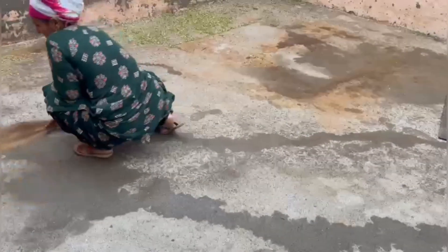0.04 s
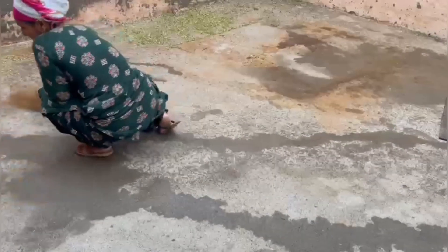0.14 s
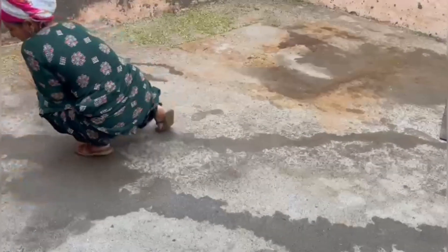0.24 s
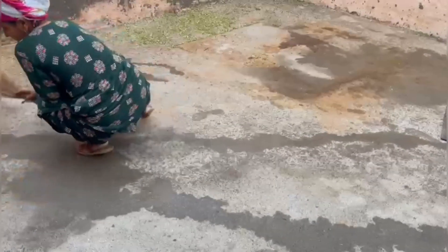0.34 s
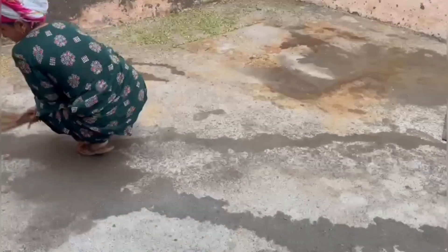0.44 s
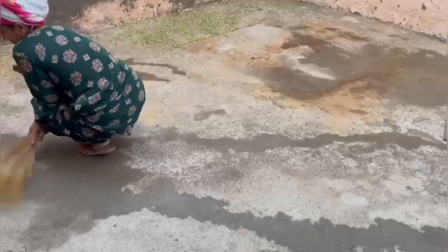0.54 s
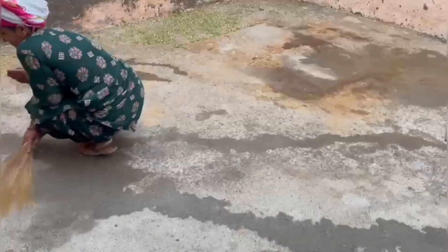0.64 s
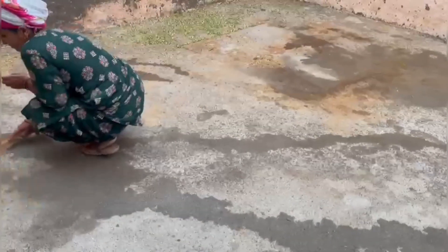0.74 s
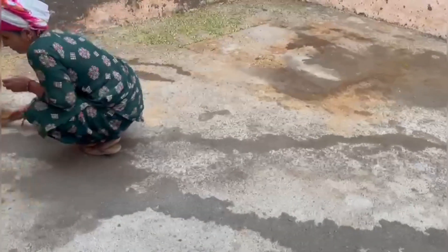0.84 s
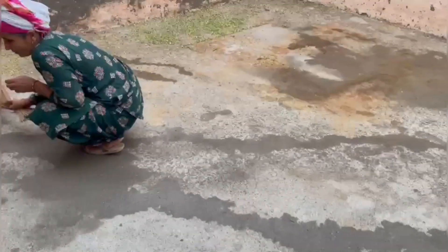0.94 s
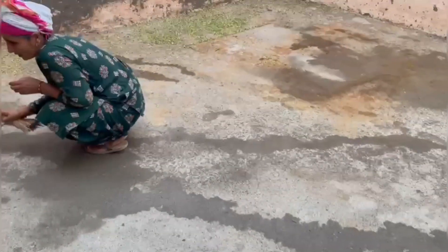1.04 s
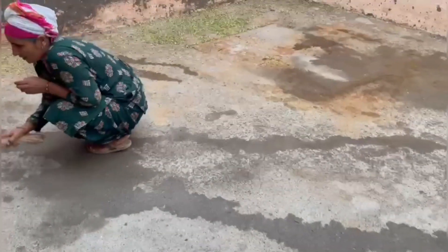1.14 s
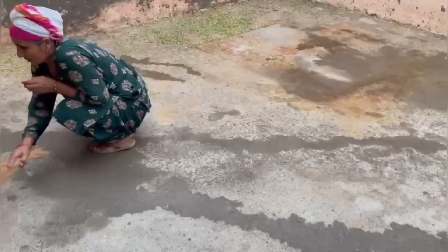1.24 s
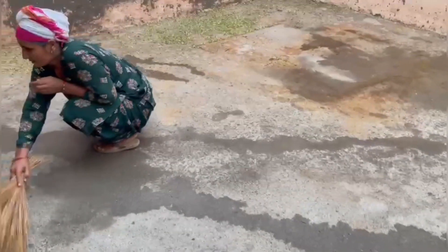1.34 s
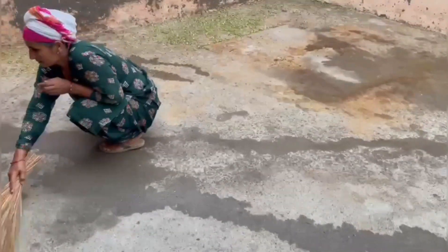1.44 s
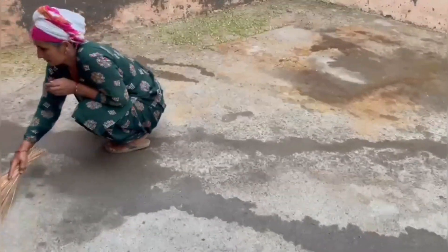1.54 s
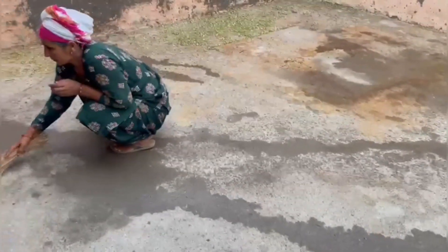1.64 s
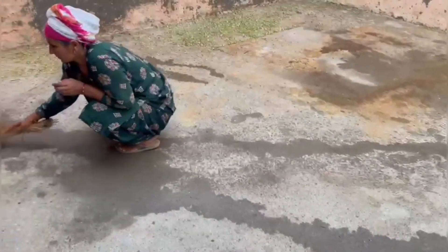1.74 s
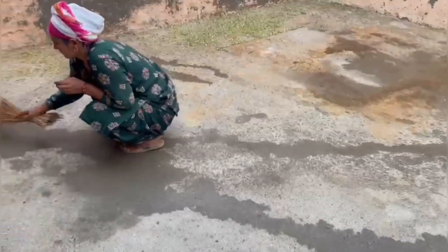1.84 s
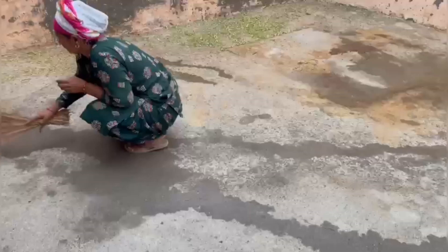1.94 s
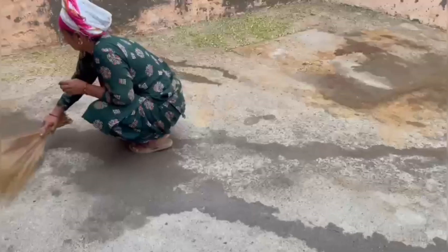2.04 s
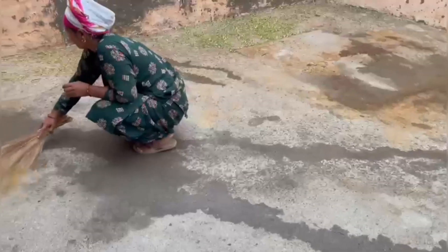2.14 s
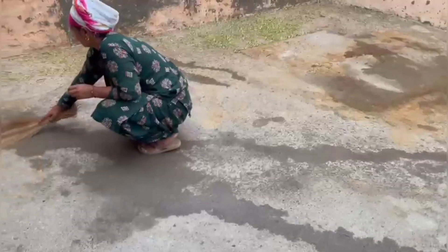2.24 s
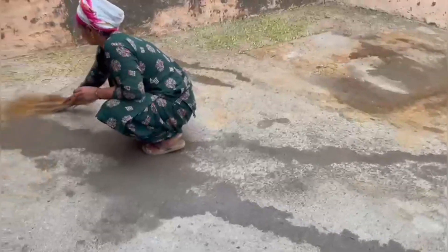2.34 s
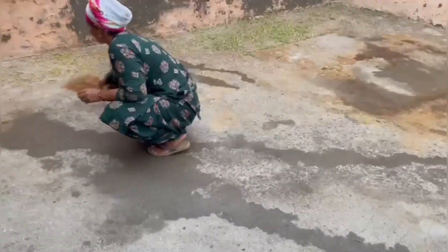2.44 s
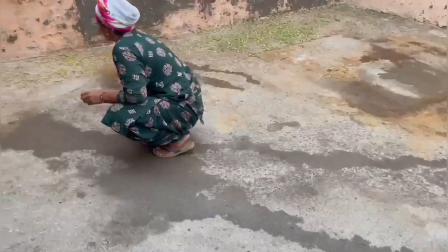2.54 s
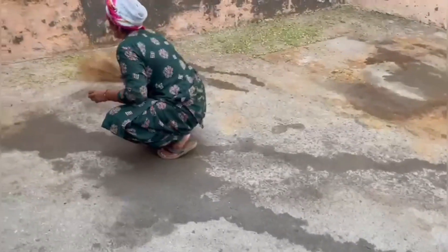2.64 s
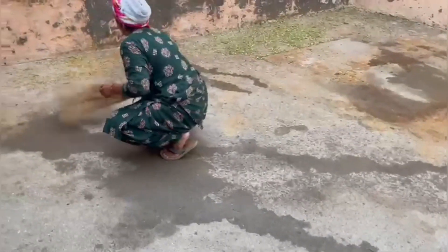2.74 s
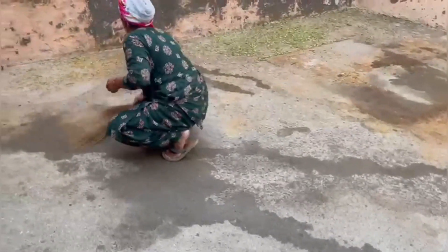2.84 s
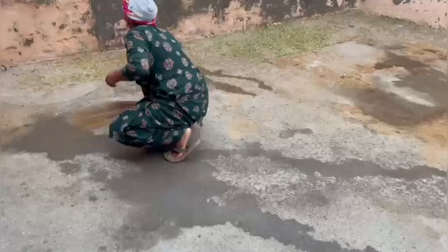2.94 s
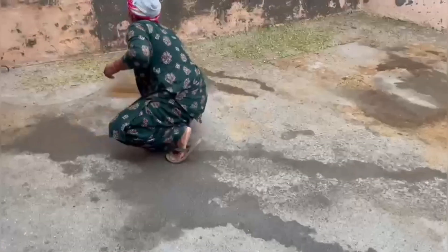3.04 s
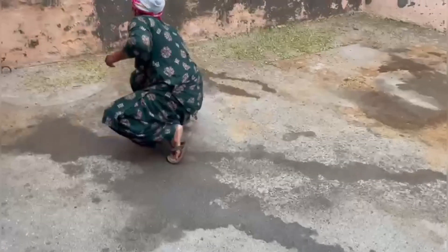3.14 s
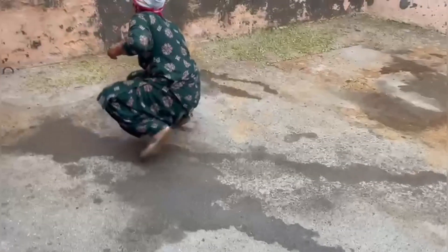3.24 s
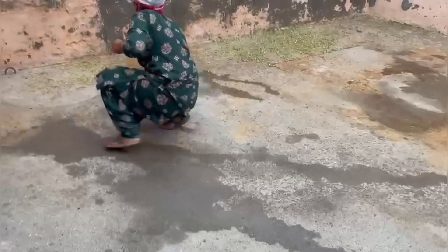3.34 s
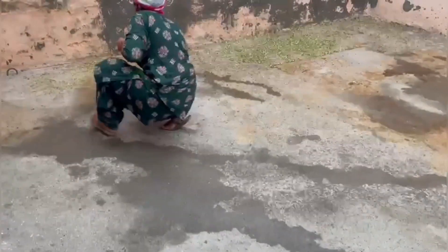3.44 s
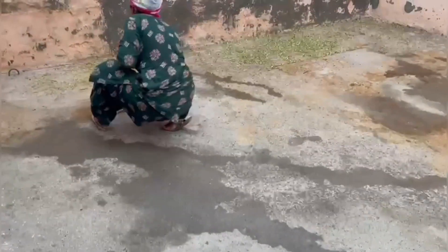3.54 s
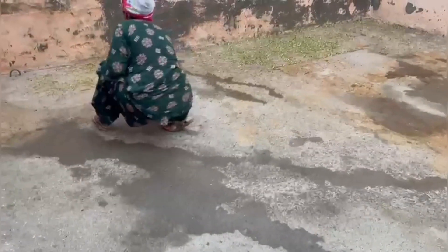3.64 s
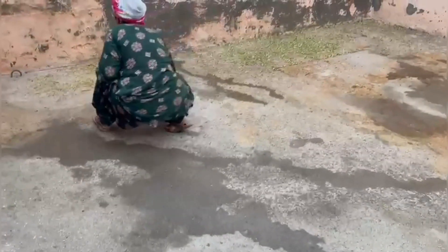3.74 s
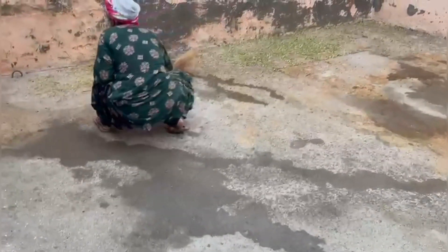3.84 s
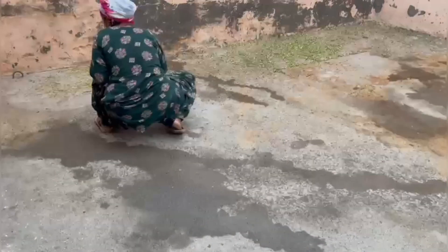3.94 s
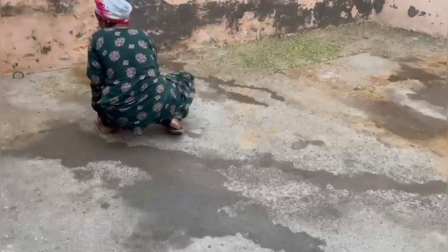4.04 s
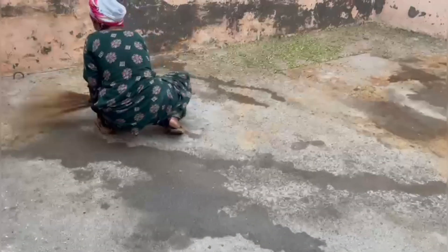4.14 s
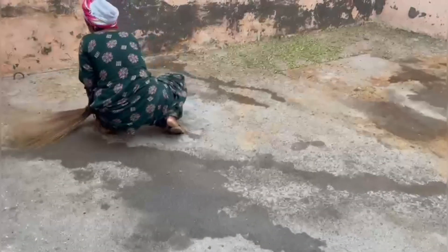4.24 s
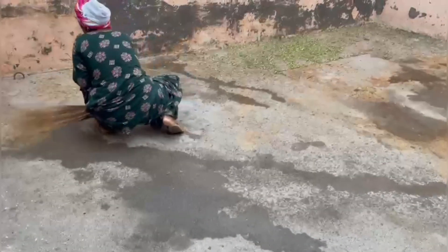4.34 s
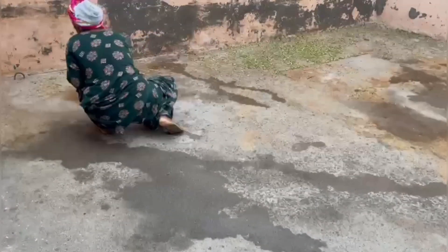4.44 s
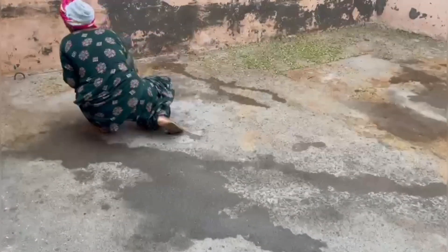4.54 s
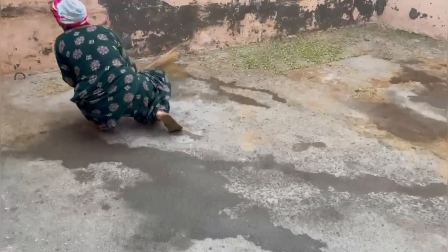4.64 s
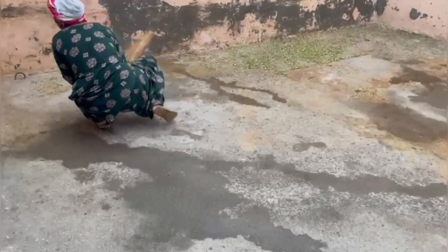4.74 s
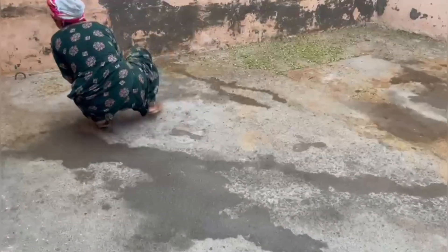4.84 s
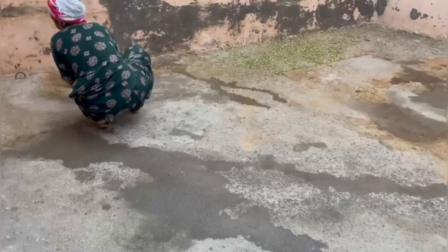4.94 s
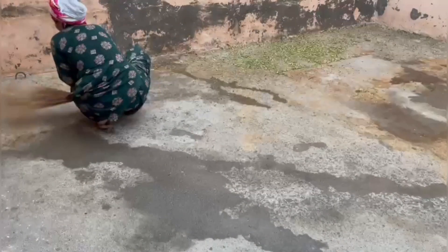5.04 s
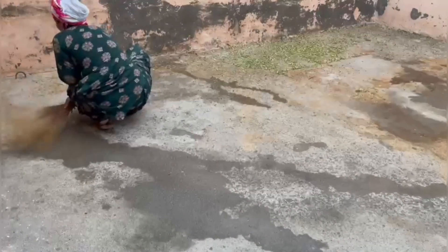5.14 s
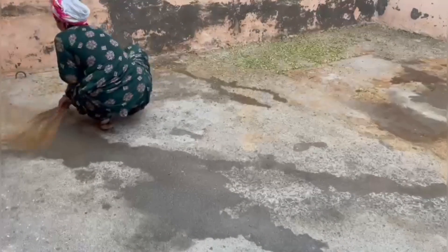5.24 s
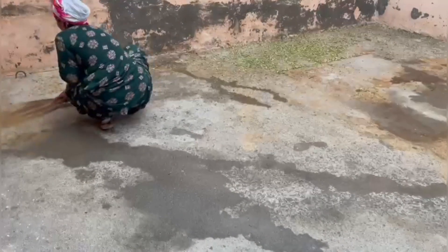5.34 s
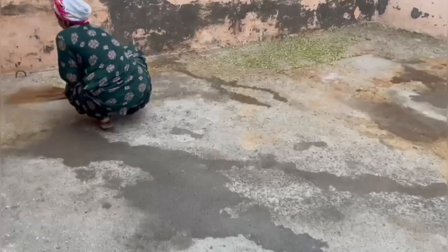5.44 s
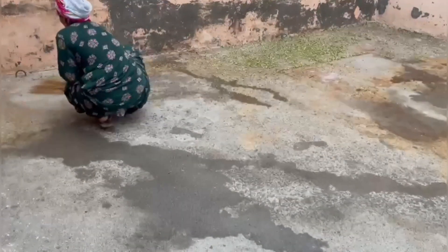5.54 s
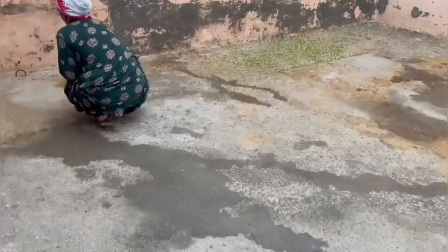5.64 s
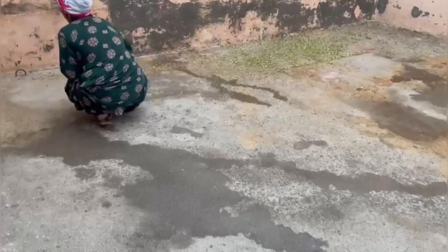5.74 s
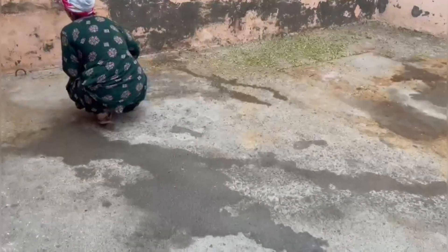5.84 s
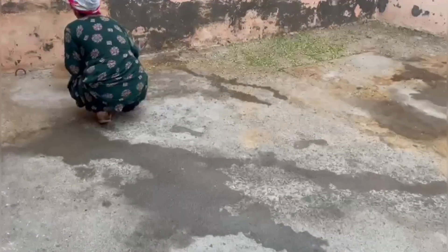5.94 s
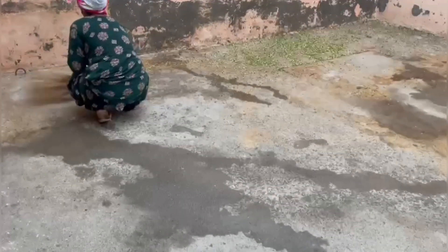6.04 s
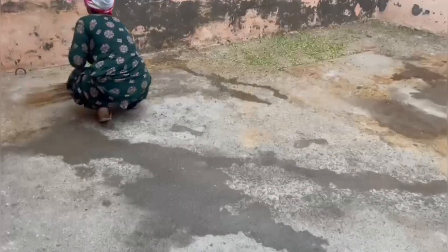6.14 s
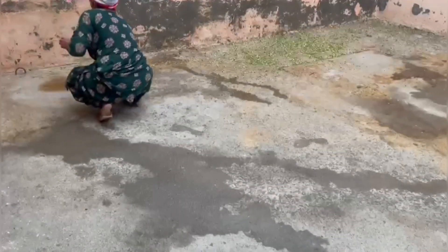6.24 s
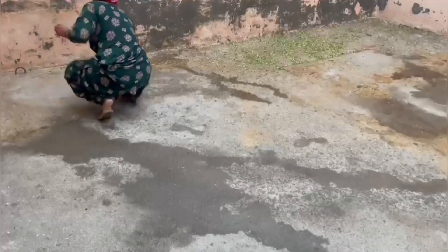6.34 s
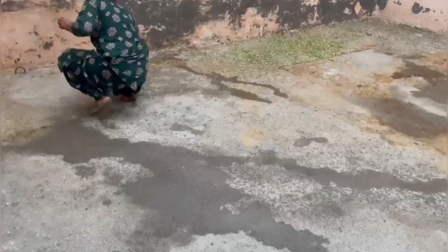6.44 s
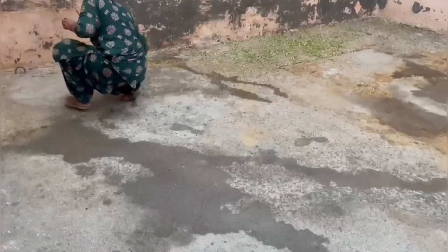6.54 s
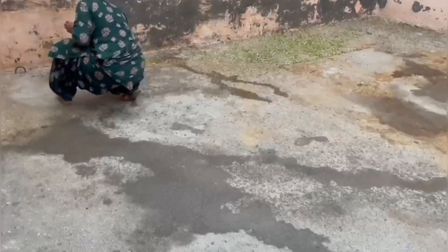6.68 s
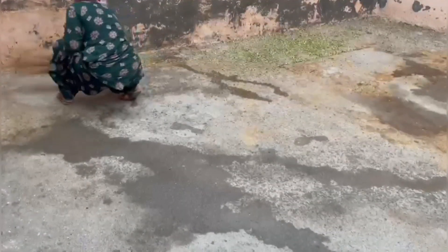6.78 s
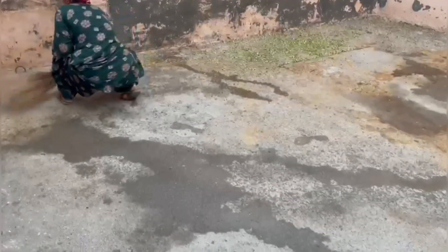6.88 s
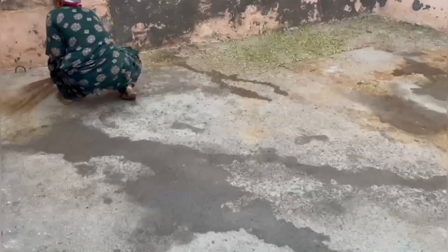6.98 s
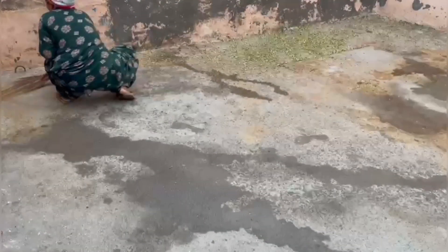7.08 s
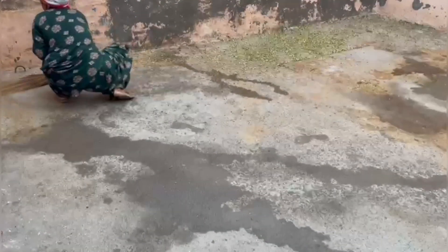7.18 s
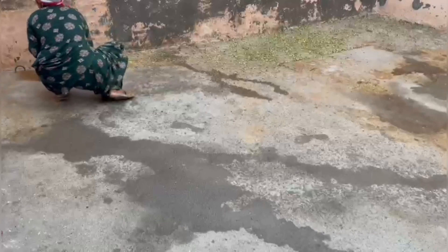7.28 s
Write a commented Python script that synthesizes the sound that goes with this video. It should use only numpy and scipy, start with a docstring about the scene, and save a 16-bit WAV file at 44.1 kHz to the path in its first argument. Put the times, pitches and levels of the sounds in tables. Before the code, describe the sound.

A short straw broom swishes over wet courtyard concrete in repeated strokes, with a few sandal slaps and faint distant traffic.

```python
"""A short straw broom sweeps wet concrete in a walled courtyard, a few metres away.
Thousands of straw tips slip over the grit as tiny clicks that merge into a hiss; the pressed bundle
scrapes lower. Straws snap, sandals slap, a bird trills once, distant traffic rumbles and hums.
A phone's two microphone ports colour the treble and turn its phase against each other."""
import sys
import numpy as np
from scipy import signal
from scipy.fft import rfft, irfft, next_fast_len
from scipy.io import wavfile
from scipy.ndimage import uniform_filter1d, map_coordinates

SR = 44100
rng = np.random.default_rng(int(sys.argv[2]) if len(sys.argv) > 2 else 0)


def generate_wav(sig):
    """Save sig (samples, or channels by samples) to the path in sys.argv[1] as 16-bit PCM at SR."""
    pcm = np.round(np.clip(np.atleast_2d(sig).T, -1, 1) * 32767).astype(np.int16)
    wavfile.write(sys.argv[1], SR, pcm)


N = 322371


def undb(db):
    return 10 ** (np.asarray(db) / 20)


def unit_rms(x):
    return x / np.sqrt(np.mean(x ** 2))


def over_time(table):
    """Rows of (t/s, ...) as automation curves, one value a sample."""
    times, *columns = np.transpose(table)
    return [np.interp(np.arange(N) / SR, times, c) for c in columns]


def over_hz(table):
    """Rows of (f/Hz, ...) as curves over log frequency, one value a bin."""
    hz, *columns = np.transpose(table)
    bins = np.fft.rfftfreq(next_fast_len(N), 1 / SR)
    return [np.interp(np.log(bins + 1), np.log(hz), c) for c in columns]


def equalise(x, gain):
    return irfft(rfft(x, next_fast_len(N)) * gain, next_fast_len(N))[..., :N]


def colour(x, eq):
    """Apply an EQ of (f/Hz, gain/dB) rows and bring the result to unit RMS."""
    return unit_rms(equalise(x, undb(over_hz(eq)[0])))


def click(pulses, eq):
    """Unit pulses become short clicks of peak 1, coloured by the EQ."""
    gain = undb(over_hz(eq)[0])
    return equalise(pulses, gain / gain.mean())


def wobble(rate):
    """Random modulator: values held 1 / rate s and smoothed twice; spread near 1."""
    hold = int(SR / rate)
    steps = np.repeat(rng.standard_normal(N // hold + 1), hold)
    return 1.01 * uniform_filter1d(uniform_filter1d(steps, hold), hold)[:N]


def wander(x, per_octave, depth_db, rate):
    """Resonances and hollows come and go: a smooth random gain over pitch and time."""
    hz, t, frames = signal.stft(x, SR, nperseg=512)
    grid = np.meshgrid(per_octave * np.log2(1 + hz / 300), rate * t, indexing="ij")
    ripple = map_coordinates(rng.standard_normal((100, 400)), grid, mode="mirror")
    return signal.istft(frames * undb(depth_db * ripple), SR, nperseg=512)[1][:, :N]


def add(out, start, x):
    i = int(start * SR)
    out[i:i + len(x)] += x[:N - i]


def decay(t60):
    """A quarter-second envelope that falls 60 dB in t60 seconds."""
    return np.exp(-np.log(1000) * np.arange(SR // 4) / SR / t60)


# EQ of the traffic bed: f/Hz, gain/dB
TRAFFIC_EQ = [(25, -23), (36, -14), (48, 8.5), (65, 4), (100, -5.5), (200, -15), (300, -19), (800, -24.5),
              (2000, -30), (4000, -39), (7000, -37.5), (8500, -33.5), (10500, -35), (11000, -44),
              (11500, -94)]
# swells of the rumble: t/s, deep level/dB, low level/dB
RUMBLE_SWELLS = [(0.0, -48, -49), (0.98, -48, -46.5), (1.2, -51, -51), (1.73, -46.5, -45.5),
                 (2.04, -54, -43.5), (2.38, -46.5, -44), (2.52, -48, -45.5), (3.18, -49, -45),
                 (3.38, -43, -44.5), (3.79, -50, -45.5), (4.34, -46, -47), (4.74, -47, -43.5),
                 (4.87, -46, -46), (5.15, -40.5, -48), (6.03, -43, -47), (6.6, -41, -46.5),
                 (6.98, -42, -46), (7.31, -42, -46.5)]
def traffic():
    """Distant traffic in three bands: deep and low rumble swell on their own, the air above rustles."""
    deep_db, low_db = over_time(RUMBLE_SWELLS)
    gain = undb(over_hz(TRAFFIC_EQ)[0])
    # crossovers: f/Hz, power share above the deep band, power share above the low band
    above_deep, above_low = over_hz([(20, 0, 0), (80, 0, 0), (100, 1, 0), (230, 1, 0), (270, 1, 1)])
    deep, low, air = (unit_rms(equalise(rng.standard_normal((2, N)), gain * np.sqrt(share)))
                      for share in (1 - above_deep, above_deep - above_low, above_low))
    air = wander(air, per_octave=4, depth_db=3, rate=16)
    rumble = undb(deep_db) * deep + undb(low_db + 1.9 * wobble(9.1)) * low
    return rumble + undb(-53 + 1.5 * wobble(5.33)) * air


# pitch and fader of the engine: t/s, f/Hz, level/dB
ENGINE_NOTE = [(1.65, 95.7, -70), (1.8, 95.8, -47), (1.95, 102, -44), (2.08, 96.6, -54), (2.22, 104.8, -44),
               (2.33, 100.3, -51), (2.45, 99, -72)]
def engine():
    """A far engine hums for a moment: one low tone that wavers a little."""
    hz, db = over_time(ENGINE_NOTE)
    wavering_hz = hz * (1 + 0.012 * wobble(28.2))
    return undb(db) * np.sqrt(2) * np.sin(2 * np.pi * np.cumsum(wavering_hz) / SR)


def bird(start=4.9, length=0.26, pitch_hz=2760, throb_hz=45):
    """One trill: a faint whistle, blurred by distance, that throbs unevenly."""
    place = np.clip(2 * (np.arange(N) / SR - start) / length - 1, -1, 1)  # -1 to 1 across the trill
    gate = uniform_filter1d(1. * (abs(place) < 1), size=800)
    throb = 1 + 0.5 * np.sin(2 * np.pi * np.cumsum(throb_hz * (1 + 0.298 * wobble(20))) / SR)
    whistle = np.sin(2 * np.pi * np.cumsum(pitch_hz + 55 * wobble(230)) / SR)
    arch_db = -57 - 9 * place ** 2
    return gate * undb(arch_db + 2 * wobble(270)) * throb * whistle


# sandal slaps: t/s, level/dB, crack re thud/dB, crack t60/s, scuff re crack/dB, press time/s
SLAPS = [(0.307, -42, 10, 0.022, -10, 0.0012), (0.3195, -38, 18.5, 0.014, -18, .0005),
         (0.333, -34, 6, 0.037, -16, 0.0017), (0.351, -44.5, 12, 0.022, -4, .002),
         (3.236, -26.5, -9.5, 0.0095, 1, 0.0077), (3.604, -27.5, -8.5, 0.012, -2.5, .006),
         (3.708, -31, -14, .01, -8, 0.0051), (4.783, -41, 32, 0.059, -23, 0.018),
         (4.801, -26, -9, 0.022, -8, 0.0029), (6.728, -52, 7.5, 0.05, 1.5, 0.006)]
# modes of the sole: f/Hz, level/dB, t60/s
SOLE_MODES = [(189.5, 2.5, 0.084), (315, -2, 0.042), (1210, 1, 0.025), (1920, -10, 0.018)]
def sandals():
    """Each slap presses down, rings the sole, crunches on grit and leaves a rough, duller scuff."""
    out, t = np.zeros(N), np.arange(SR // 4) / SR
    grit_eq = [(400, -22), (750, -8), (1250, 8), (2600, 0), (3800, -6), (6200, -16.5), (10000, -31)]
    drag_eq = [(300, -3), (1100, -3.5), (2000, 2.5), (3000, -19.5)]
    grit = colour(rng.standard_normal(N), grit_eq)
    drag = colour(rng.standard_normal(N), drag_eq) * undb(3.6 * wobble(120))
    for k, (start, db, crack_db, crack_t60, scuff_db, press) in enumerate(SLAPS):
        own = slice(k * len(t), (k + 1) * len(t))  # fresh noise for each slap
        # a slower press rings the upper modes less
        thud = sum(undb(mode_db) * np.sin(2 * np.pi * hz * t) * decay(t60) / (1 + (0.23 * hz * press) ** 2)
                   for hz, mode_db, t60 in SOLE_MODES)
        crack = decay(crack_t60) * grit[own]
        scuff = undb(scuff_db) * decay(t60=0.24) * drag[own]
        attack = (1 - np.exp(-t / press)) ** 2
        add(out, start, attack * undb(db) * (thud + undb(crack_db) * (crack + scuff)))
    return out


# snaps between strokes: t/s, level/dB, dull re bright layer/dB, burst t60/s
STRAW_SNAPS = [(1.189, -36, -12, 0.0043), (1.205, -38, -20, .005), (1.217, -34, -16, .004),
               (1.2205, -28, -17, 0.0037), (1.2368, -22.5, -20, .012), (1.242, -34, -18, .003),
               (1.2437, -31, -13, .01), (1.2545, -25, -17, .006), (1.2598, -26.5, -17, .005),
               (1.288, -32, -20, .008), (1.398, -37, -12, .004), (2.795, -27.5, -7, .004),
               (2.811, -31, -15, .004), (5.015, -38, -3, .004), (5.136, -49, -20, .004),
               (6.61, -32, -2, 0.0044), (6.71, -28.5, -12, 0.038), (6.809, -43, -20, .004)]
# EQs of their bright and dull layers: f/Hz, gain/dB
BRIGHT_EQ = [(3000, -35), (5000, -8), (6500, 1), (9000, 5.5), (11000, 10), (11800, -39)]
DULL_EQ = [(1500, -41), (2800, 7), (5500, 2), (7500, -33)]
def snaps(strays_per_s=30):
    """Single straws or grit snap in a crisp burst and a short rustle; faint stray ticks fall at random."""
    bright = (rng.random(N) < strays_per_s / SR) * rng.standard_normal(N) * undb(-65)
    dull, rustle = np.zeros(N), undb(-30) * decay(t60=0.022)
    for start, db, dull_db, t60 in STRAW_SNAPS:
        cracks = rng.standard_normal(len(rustle))
        burst = cracks * decay(t60)
        snap = undb(db) * (burst / np.linalg.norm(burst) + cracks * rustle)
        add(bright, start, snap)
        add(dull, start, undb(dull_db) * snap)
    return click(bright, BRIGHT_EQ) + click(dull, DULL_EQ)


def lift_off(release, fall_db_per_s, tail_db):
    """Unit gain until the straw lifts; then a fast fall, and a slower tail that lingers in the yard."""
    since = np.maximum(np.arange(N) / SR - release, 0)
    return (undb(fall_db_per_s * since) + undb(tail_db - 96 * since)) / (1 + undb(tail_db))


# strokes: touchdown t/s, touch level/dB, rest/s, build/s, full level/dB, hold/s, change over hold/dB,
# bundle re tips/dB, release slope/(dB/s), landing/s, stalks re bundle/dB
BROOM_STROKES = [(-0.1, -34, 0.0045, 0.18, -13, 0.073, -4.5, -15, -155, 0.018, -13),
                 (0.584, -32, 0.052, 0.14, -14.5, 0.072, -1.5, -15, -140, 0.029, -13),
                 (1.429, -35, 0.0036, 0.055, -23, 0.12, -3, -15.5, -140, 0.036, -9.5),
                 (1.605, -27.5, 0.0085, 0.076, -16.5, 0.065, -1.5, -16, -145, .02, -11.5),
                 (2.061, -39.5, 0.03, .13, -15.5, 0.22, -1, -16, -140, 0.013, -10),
                 (2.86, -36.5, 0.054, 0.1, -17, 0.18, -4, -15.5, -140, 0.032, -9.5),
                 (3.527, -41, 0.0033, 0.14, -18.5, 0.15, -2.5, -13.5, -150, 0.018, -14),
                 (4.25, -36, 0.059, 0.11, -16, 0.17, -7.5, -18, -125, 0.029, -7),
                 (5.198, -36.5, 0.034, 0.12, -16, 0.18, -1, -17.5, -140, 0.011, -8.5),
                 (5.618, -36, .005, 0.081, -26.5, 0.057, -0.5, -12, -130, .02, -10),
                 (6.107, -39.5, 0.047, 0.091, -20, 0.14, 0, -14, -130, 0.019, -8.5),
                 (6.946, -39, 0.0054, 0.15, -17.5, 0.081, -10.5, -17.5, -140, 0.022, -6),
                 (7.165, -27, 0.0055, 0.064, -23.5, .09, 5.5, -15, -140, .02, -9)]
# light grazes between strokes: t/s, level/dB, bundle re tips/dB
BROOM_GRAZES = [(1.241, -46, -27), (2.794, -60, -20), (3.468, -62, 7), (4.791, -41, -3.5), (5.017, -49, -3),
                (6.71, -49, -1)]
def stroke_envelopes(knee_time=0.66, knee_rise=0.79):
    """Gains of tips, bundle and stalks: each stroke lands, rests, builds, holds and lifts off."""
    t, tips, bundle, stalks = np.arange(N) / SR, 0, 0, 0
    for stroke in BROOM_STROKES:
        start, touch_db, rest, build, full_db, hold, change_db, bundle_db, fall, land, stalks_db = stroke
        spans = [-land, land, rest, knee_time * build, (1 - knee_time) * build, hold / 2, hold / 2]
        times = start + np.cumsum(spans)
        knee_db = touch_db + knee_rise * (full_db - touch_db)  # the push slows near its top
        end_db = full_db + change_db
        middle_db = (full_db + end_db) / 2 + 10.5 * hold  # long holds swell in the middle
        levels = [touch_db - 22, touch_db, touch_db, knee_db, full_db, middle_db, end_db]
        contact = undb(np.interp(t, times, levels, left=-200))
        tips = np.hypot(tips, contact * lift_off(times[-1], fall, tail_db=-64))
        # the bundle leaves the ground just after the tips
        pressed = contact * undb(bundle_db) * lift_off(times[-1] + 0.0093, fall, tail_db=-4)
        bundle = np.hypot(bundle, pressed)
        stalks = np.hypot(stalks, undb(stalks_db) * pressed)
    for peak, db, bundle_db in BROOM_GRAZES:
        graze = undb(db + np.minimum(400 * (t - peak), -150 * (t - peak)))  # rise and fall in dB/s
        tips, bundle = np.hypot(tips, graze), np.hypot(bundle, undb(bundle_db) * graze)
    return tips, bundle, stalks


def slips(per_s=16000):
    """Straws let go at random moments, some harder than the rest; two rows for two parts of the bundle."""
    lets_go = rng.random((2, N)) < per_s / SR
    return lets_go * rng.standard_normal((2, N)) * undb(-0.5 * rng.exponential(size=(2, N)))


# EQs of the straw tips, the pressed bundle and the thick stalks: f/Hz, gain/dB
TIPS_EQ = [(1200, -40), (2500, -17), (3700, -14), (5000, -11), (7000, -11), (8500, -7), (9500, -4),
           (10400, 0), (10950, -1), (11400, -8), (11700, -22), (12200, -40)]
BUNDLE_EQ = [(500, -39.5), (1000, -14.5), (1400, -0.5), (2000, 0.5), (2800, -3.5), (4000, -15.5)]
STALKS_EQ = [(150, -21), (400, -3.5), (800, -2.5), (1200, -0.5), (1800, -17.5)]
def broom():
    """Tips hiss, the pressed bundle scrapes lower, thick stalks lower still."""
    tips, bundle, stalks = stroke_envelopes()
    pressed_slips = slips()
    hiss = tips * colour(slips(), TIPS_EQ)
    scrape = bundle * colour(pressed_slips, BUNDLE_EQ) + stalks * colour(pressed_slips, STALKS_EQ)
    # faint narrow resonances shift as other straws take the load
    rasp = wander(hiss + scrape, per_octave=14, depth_db=2, rate=24)
    return undb(0.16 * wobble(60)) * rasp  # a slight stutter over the rough ground


def scene():
    """Mid and side rows: what reaches both ports alike, and what comes from the sides and the walls."""
    spots = snaps() + sandals() + bird() + engine()
    # early bounce off the ground, then the walls
    echoes = rng.standard_normal(SR // 4) * (decay(t60=0.004) + undb(-17) * decay(t60=0.089))
    reverb = signal.fftconvolve(spots, echoes / np.linalg.norm(echoes))[:N]
    return broom() + np.array([spots, reverb]) + traffic()


# stereo image of the ports: f/Hz, left phase lead/rad, likeness/0-1, left re right/dB
PORT_IMAGE = [(60, 0, .995, 1), (200, -.2, .85, 4), (400, -.3, .5, 1.5), (800, -.9, .3, 3),
              (1100, .5, .7, 1), (1400, 1.2, .87, 0), (1650, 3.1, .92, 0), (2100, 6.1, .7, 0),
              (2500, 6.4, .8, .5), (3000, 6.8, .3, 3.5), (3800, 6.4, .85, 2), (5000, 6.7, .5, 4.5),
              (6500, 6.3, .8, 2.5), (7000, 6.6, .5, 4), (7500, 7.1, .65, 3), (8300, 6.3, .995, 0),
              (8800, 6.27, .995, 0), (9300, 4.8, .82, 0), (9800, 3.4, .92, 0), (10250, 3.14, .999, 0),
              (10600, 2.8, .93, 0), (10900, 2.3, .8, 0), (11200, .8, .6, -.5), (11600, 0, .85, -2)]
# phase swing between the ports as the direction of arrival sways: f/Hz, swing/rad
PHASE_SWAY = [(700, 0), (1300, 1.42), (2000, 1.38), (2600, 0.79), (7000, 1.12), (8200, 0)]
def record(dry, top_hz=12100):
    """Two ports, unlike in phase and gain, turn mid and side to stereo; peaks round off, the top is cut."""
    lead, alike, balance_db = over_hz(PORT_IMAGE)
    sway, = over_hz(PHASE_SWAY)
    blend = np.clip(0.5 + 0.49 * wobble(13), 0, 1)  # crossfade between two directions
    channels = []
    for sign in (1, -1):
        port = undb(sign * balance_db / 2) * np.exp(0.5j * sign * lead)
        mid_gain = port * np.sqrt((1 + alike) / 2)
        one, other = (equalise(dry[0], mid_gain * np.exp(0.5j * sign * turn)) for turn in (sway, -sway))
        side = equalise(dry[1], sign * port * np.sqrt((1 - alike) / 2))
        channels.append(blend * one + (1 - blend) * other + side)
    high_cut = signal.ellip(14, 0.2, 80, top_hz, fs=SR, output="sos")
    return signal.sosfilt(high_cut, np.tanh(channels))


dry = scene()
out = record(dry)
generate_wav(out)
```